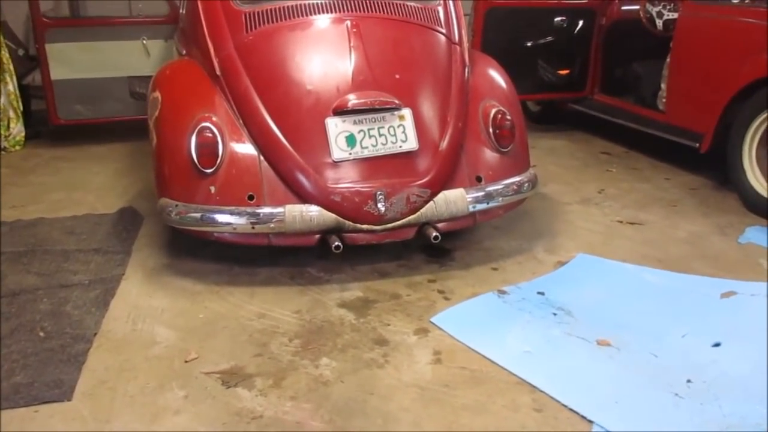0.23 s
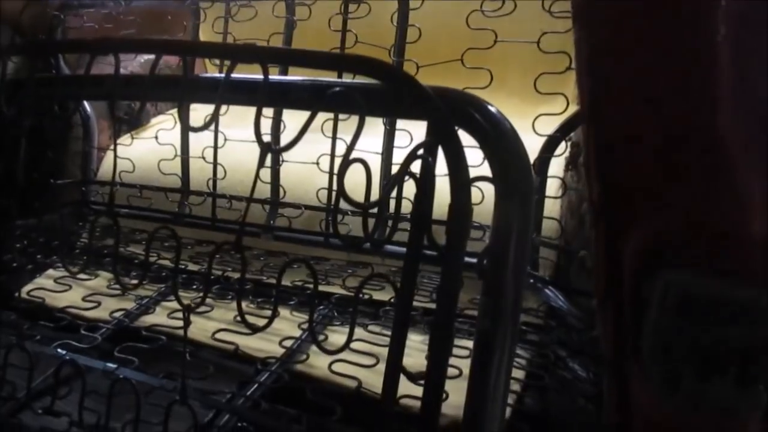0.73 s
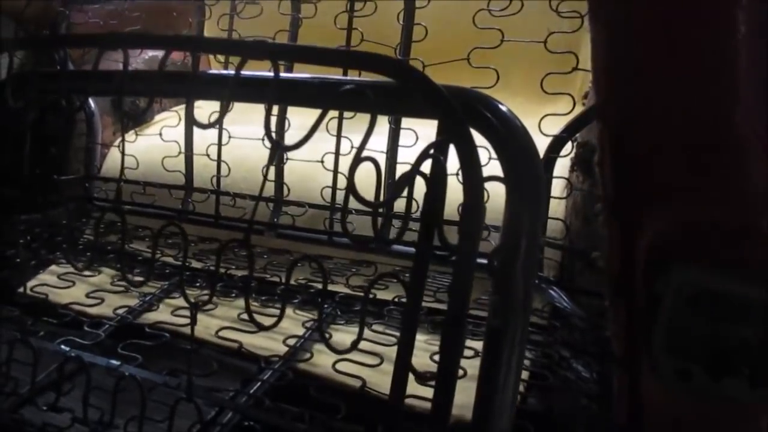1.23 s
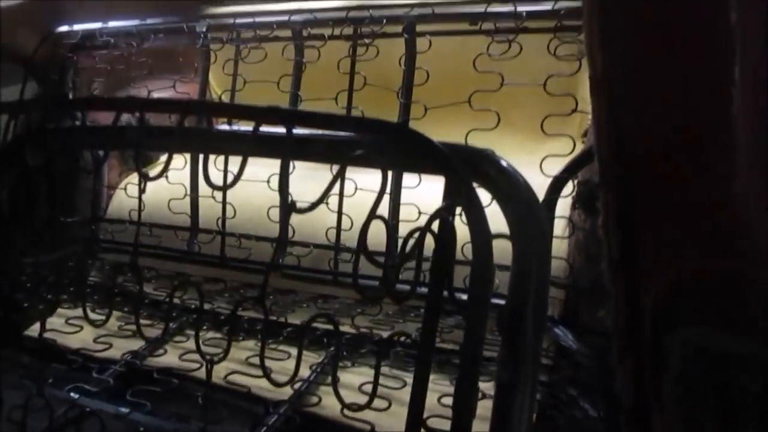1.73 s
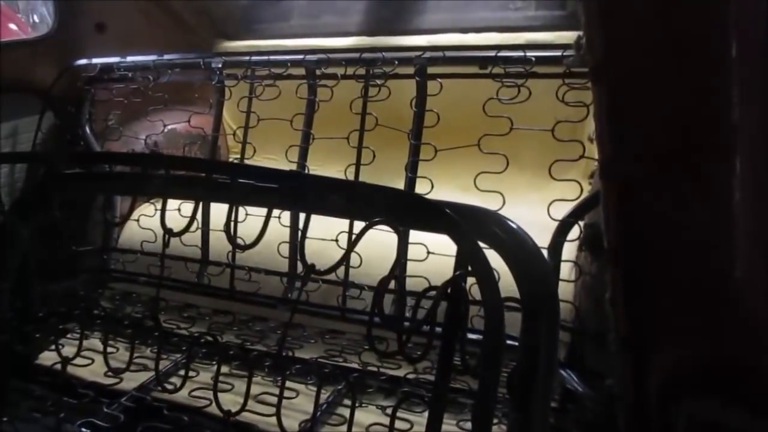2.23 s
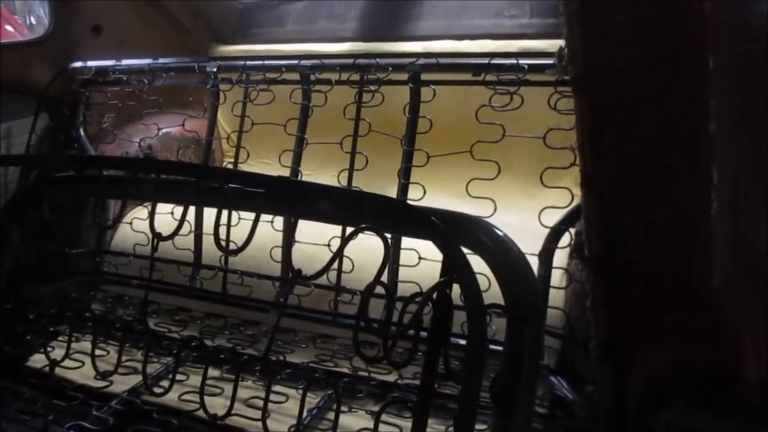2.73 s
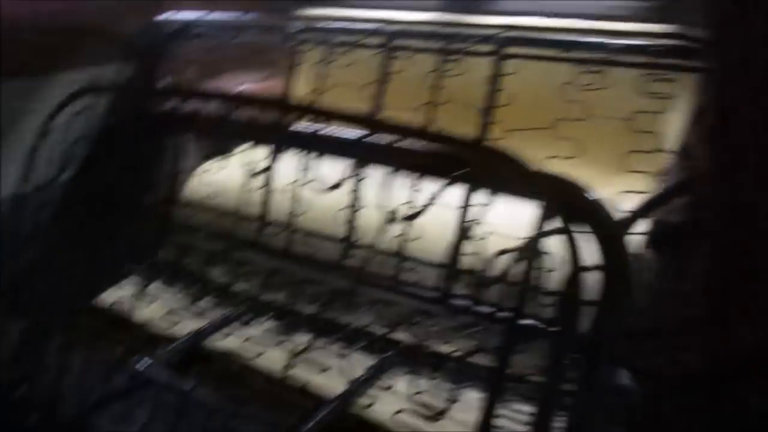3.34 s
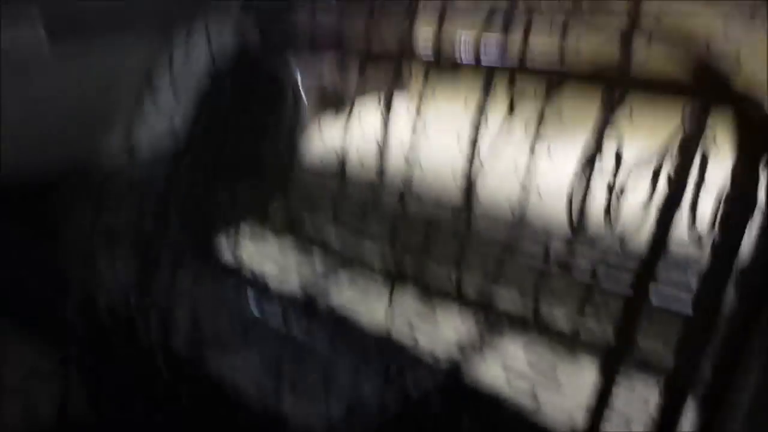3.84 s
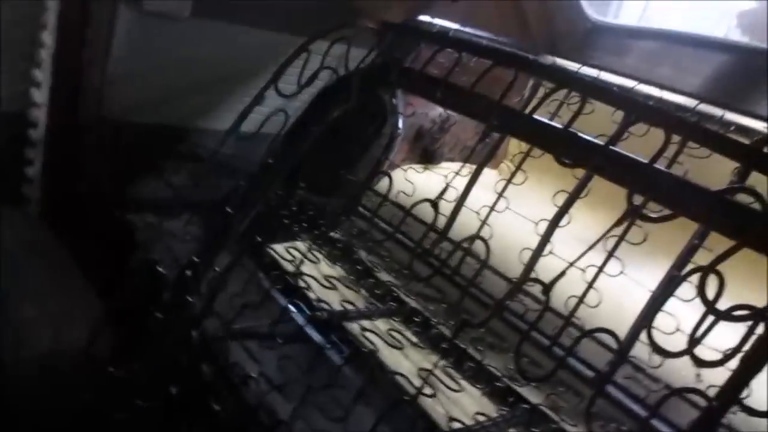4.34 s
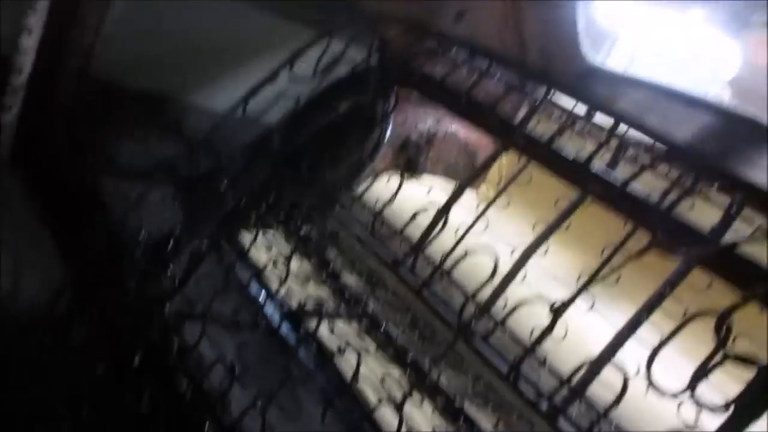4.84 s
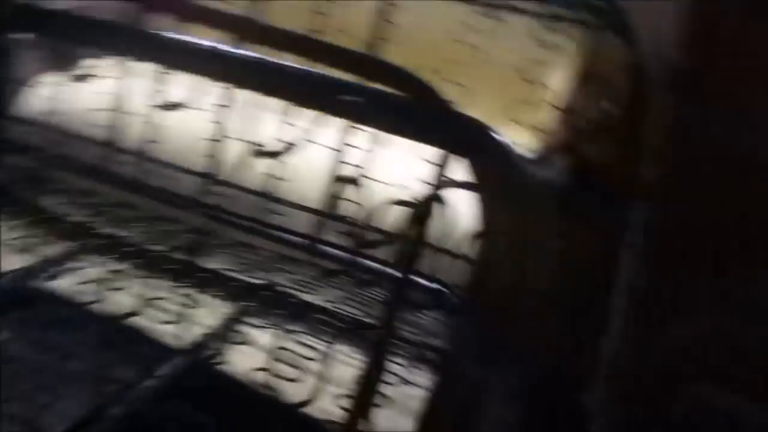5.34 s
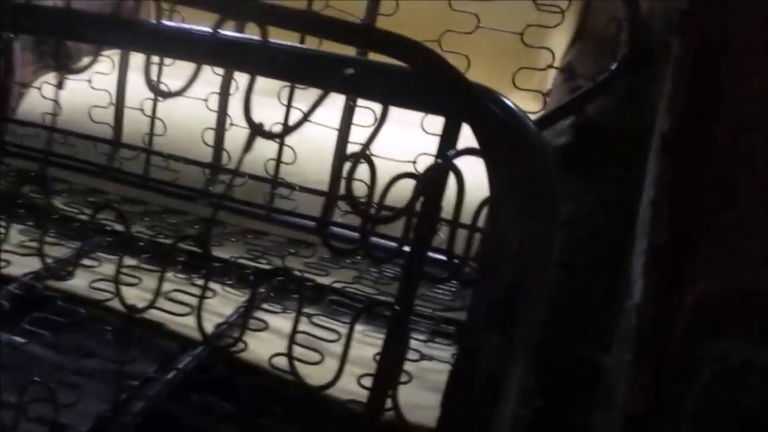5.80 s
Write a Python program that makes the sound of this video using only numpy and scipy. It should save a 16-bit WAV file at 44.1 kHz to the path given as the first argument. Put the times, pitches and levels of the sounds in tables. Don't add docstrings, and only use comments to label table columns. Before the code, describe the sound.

An air-cooled engine idles fast, first at the tail pipes, then droning and ticking inside a bare car body, and coasts unevenly to a stop.

```python
import sys
import numpy as np
from scipy import signal
from scipy.fft import rfft, irfft
from scipy.io import wavfile
from scipy.ndimage import uniform_filter1d

SR = 44100
rng = np.random.default_rng(int(sys.argv[2]) if len(sys.argv) > 2 else 0)


def inscribe(sig):
    pcm = np.round(np.clip(np.atleast_2d(sig).T, -1, 1) * 32767)
    wavfile.write(sys.argv[1], SR, pcm.astype(np.int16))


def decibels_to_gain(level_db):
    exponent = np.asarray(level_db, float) / 20
    return 10 ** exponent


N = 267642
OUTSIDE_END_S, INSIDE_START_S = .1875, .5645
KEY_OFF_S = 4.63
IDLE_HZ = 12.5

# frequency in Hz, width in Hz, level in dB,
# crank angle at which it is struck as a share of the cycle (0-1).
CABIN_MODES = [
    (30, 7, -5, .05),
    (47, 12, 0, .05),
    (100, 40, -14, .053),
    (148, 22, 0, .378),
    (270, 45, -5, .139),
]


def set_level(x, db):
    return x * decibels_to_gain(db) / np.sqrt(np.mean(x ** 2))


def curve(table):
    s, value = np.transpose(table)
    return np.interp(np.arange(N) / SR, s, value)


def coloured(points):
    hz, db = np.transpose(points)
    bin_hz = np.arange(N // 2 + 1) * SR / N
    shape = decibels_to_gain(np.interp(np.log(bin_hz + 1), np.log(hz), db, -90, -90))
    return set_level(irfft(rfft(rng.standard_normal(N)) * shape, N), 0)


def walk(rate_hz):
    hold = int(SR / rate_hz)
    steps = np.repeat(rng.standard_normal(N // hold + 1), hold)
    return uniform_filter1d(uniform_filter1d(steps, hold), hold)[:N]


def ring(x, modes):
    out = 0
    for k, (hz, width, db) in enumerate(modes):
        out = out + (-1) ** k * decibels_to_gain(db) * signal.lfilter(*signal.iirpeak(hz, hz / width, SR), x)
    return out


def orders(table, cycles, extra_db, angle, wobble_db):
    out = 0
    for k, db in table:
        gain = decibels_to_gain(db + extra_db(k) + wobble_db * walk(9.9))
        out = out - gain * np.cos(2 * np.pi * k * (cycles - angle(k)))
    return out


def since_key_off():
    return (np.arange(N) / SR - KEY_OFF_S).clip(0)


def unfired():
    return np.minimum(since_key_off() / .14, 1)


def cycle_rate():
    # time in seconds, firing rate in Hz (four firings a cycle).
    idle_hunt = [(.66, 49.8), (.9, 50.1), (1.14, 49.9), (1.46, 50.31), (1.8, 49.92), (2.1, 49.66),
                 (2.42, 49.46), (2.72, 50.36), (3.15, 50.04), (3.52, 49.55), (4.0, 50.33), (4.2, 50.02),
                 (4.36, 50.16), (4.55, 49.85)]
    down = np.exp(-since_key_off() / 1.0)
    stumble = 1 + .05 * 2 * (1 - down) * walk(14)
    return curve(idle_hunt) * down * stumble / 4


def cabin_db(hz):
    return 10 * np.log10(sum(decibels_to_gain(2 * db) / (1 + (2 * (hz - f) / w) ** 2) for f, w, db, _ in CABIN_MODES))


def struck(hz):
    return min(CABIN_MODES, key=lambda mode: abs(np.log(mode[0] / hz)))[3]


def cabin_boom(hz, cycles, slow):
    # multiple of the cycle, level in dB.
    cabin_orders = [(1, -47), (2, -35), (3, -18), (4, -3), (5, -28), (6, -24), (7, -20), (8, -11), (9, -19),
                    (10, -12), (11, -19), (12, 0), (13, -19), (14, -12), (15, -19), (16, -28), (17, -19),
                    (18, -18), (19, -23), (20, -10), (21, -14), (22, -7), (23, -15), (24, -25)]
    # multiple of the cycle, level in dB.
    gear_mesh = [(34, -27), (52, -29), (54, -24), (56, -25), (61, -21), (62, -20)]
    # time in seconds, level in dB.
    rocking = [
        (4.63, 0),
        (4.82, 4),
        (5.02, -8),
        (5.2, 3),
        (5.55, 2),
        (5.62, -12),
        (5.72, -10),
        (5.84, 3),
        (5.93, -14),
    ]
    firing_db = curve(rocking)
    uneven_db = .3 - 8 * unfired()
    soft_db = .6 * np.minimum(8 * slow.clip(0), 1)

    def slide_db(k):
        resonance_db = cabin_db(k * hz) - cabin_db(k * IDLE_HZ)
        stroke_db = uneven_db if k % 4 else firing_db
        return resonance_db + stroke_db - soft_db * k - 2.5 * (k % 2)

    boom = orders(cabin_orders, cycles, slide_db, lambda k: struck(k * IDLE_HZ), 1.1 + 3 * slow)
    boom += orders(gear_mesh, cycles, lambda k: -70 * slow, lambda k: .3, 0.73)
    return decibels_to_gain(-20.0) * boom * decibels_to_gain(3 * slow * walk(22))


def tail_pipes():
    # multiple of the cycle, level in dB.
    pipe_orders = [(1, -34), (2, -32), (3, -30.5), (4, -10), (5, -27), (6, -4), (7, -26), (8, -2.5),
                   (9, -17.5), (10, -4.5), (11, -16.5), (12, -2), (13, -21.5), (14, -10), (15, -8),
                   (16, -4.5), (17, -20.5), (18, -3.5), (19, -4), (20, -5), (21, -12.5), (22, -5),
                   (23, -12), (24, -8.5), (25, -30), (26, -24.5), (27, -13.5), (28, -15.5)]
    # frequency in Hz, density in dB per Hz.
    gas_spectrum = [(220, -46.5), (380, -8), (451, -9), (615, -2), (665, -6), (1090, -7.5), (1420, -19.5),
                    (2950, -17.5), (3290, -23.5), (8750, -23.5), (15500, -41.5)]
    cycles = 11.98 * np.arange(N) / SR
    note = orders(pipe_orders, cycles, lambda k: -7 * (k % 2), lambda k: rng.random(), 1.2)
    pulse = decibels_to_gain(2 * np.cos(8 * np.pi * cycles) + 1.5 * walk(40))
    return decibels_to_gain(-26.0) * note + set_level(pulse * coloured(gas_spectrum), -33)


def valve_clatter(cycles):
    # crank angle (0-1), level in dB.
    knocks = [(0.069, -5.5), (.29, -11.5), (0.349, -5.5), (0.541, -2), (.83, -9.5), (.94, -8.5)]
    # frequency in Hz, width in Hz, level in dB.
    case_modes = [(348, 35, -3.5), (417.5, 26.2, -3), (498, 108, -7.5), (634.5, 8.5, -5), (659, 10.9, -2.5),
                  (772, 49.7, -2.5), (909, 65, -6), (1041, 38, -6.5), (1112, 38.5, -8.5)]
    angle, size = rng.random((16, 2)).T
    angle = np.append(angle, np.array(knocks)[:, 0])
    size = np.append((2 * size - 1) * decibels_to_gain(-3), -decibels_to_gain(np.array(knocks)[:, 1]))
    turns = np.arange(int(cycles[0]), int(cycles[-1]))[:, None] + angle
    chance = rng.standard_normal(turns.shape + (2,))
    at = np.searchsorted(cycles, turns) + (8 * chance[..., 0]).astype(int)
    blows = np.zeros(N)
    np.add.at(blows, at.clip(0, N - 1).ravel(), (size * decibels_to_gain(2 * chance[..., 1])).ravel())
    rattle = decibels_to_gain(2) * rng.standard_normal(N)
    return set_level(ring(set_level(blows, 0) + rattle, case_modes), 0)


def loose_tappets(cycles):
    # crank angle (0-1), panel frequency in Hz, width in Hz, level in dB.
    tappet_panels = [
        (.25, 775, 24, -38.5),
        (.0, 665, 45, -43),
        (.9, 410, 45, -47),
        (.04, 1000, 90, -48),
    ]
    out = 0
    turns = np.arange(int(cycles[0]), int(cycles[-1]))
    for angle, hz, width, db in tappet_panels:
        blows = np.zeros(N)
        blows[np.searchsorted(cycles, turns + angle)] = decibels_to_gain(2 * rng.standard_normal(len(turns)))
        padded = uniform_filter1d(uniform_filter1d(blows, size=14), size=11)
        out = out + set_level(ring(padded, [(hz, width, 0)]), db + 30)
    return out


def airborne_db(hz, law):
    # time in seconds, gain in dB.
    facing = [(.56, 4.5), (1.4, 1), (1.75, 2), (2.5, 4.5), (3.1, 7.5), (3.4, -1), (3.95, -6), (4.1, 1.5),
              (4.28, -4), (4.65, -2.5), (5.4, 1), (5.85, -3), (6.0, -3)]
    idle_db, per_speed_db, per_facing_db, unfired_db = law
    speed_db = 20 * np.log10(hz / hz[0])
    return idle_db + per_speed_db * speed_db + per_facing_db * curve(facing) + unfired_db * unfired()


def valve_gear(hz, cycles, slow):
    clatter_law = (-29.5, 1, 0.12, 1.66)
    strikes = decibels_to_gain(-1) * valve_clatter(cycles) + decibels_to_gain(-12 * slow) * loose_tappets(cycles)
    return decibels_to_gain(airborne_db(hz, clatter_law)) * strikes


def roughness_and_rumble(strokes, slow):
    # frequency in Hz, density in dB per Hz.
    rough_spectrum = [(25, -22), (45, -6), (68, -12), (95, -6), (130, 0), (155, -1), (190, -5), (265, 2),
                      (310, -6), (400, -20)]
    # frequency in Hz, width in Hz, level in dB.
    pan_modes = [(92, 26, -2), (120, 20, -5), (140, 30, 0), (160, 18, -8), (228, 30, -9)]
    rough_db = 2 - 8 * unfired() - 35.5 - 9 * slow + 2 * walk(12) + 3 * slow * strokes
    rough = decibels_to_gain(rough_db) * coloured(rough_spectrum)
    peak_db, rest_db, rise_s, settle_s = -25, -35.5, .12, 0.41
    since = since_key_off()
    settle = np.exp(-((since - rise_s).clip(0) / settle_s) ** 2)
    rumble_db = rest_db + (peak_db - rest_db) * settle - 30 * (1 - since / rise_s).clip(0)
    pan = set_level(ring(coloured(rough_spectrum), pan_modes), 0)
    return rough + decibels_to_gain(rumble_db + 5 * slow * strokes) * pan


def cooling_fan(hz, cycles, breath_db, slow):
    # frequency in Hz, density in dB per Hz.
    fan_spectrum = [(740, -22), (1250, -1), (1560, -5), (1690, -3), (2410, -6.5), (2900, -7), (5200, -16.5),
                    (6760, -19), (11400, -120)]
    # frequency in Hz, density in dB per Hz.
    hiss_spectrum = [(3060, 0), (5200, -4.5), (6880, -3), (8570, -2), (9350, -4), (11600, -9),
                     (14600, -24.5), (15500, -33)]
    # idle level in dB, dB per dB of speed, dB per dB of facing, dB gained once unfired.
    fan_law = (-40.5, 1.9, 0.25, 0.9)
    hiss_law = (-49, 0.7, 0.25, -5.5)
    shaft = decibels_to_gain(-37.5) * np.sin(2 * np.pi * 3.24 * cycles) * (hz / IDLE_HZ) ** 4
    blown_db = airborne_db(hz, fan_law) + 0.34 * breath_db + 1.07 * walk(13)
    blown = decibels_to_gain(blown_db) * coloured(fan_spectrum)
    air = coloured(hiss_spectrum)
    chirp = decibels_to_gain(-8.0 - 7.2 * slow + 4.2 * walk(11)) * ring(air, [(8300, 300, 0)])
    hiss_db = airborne_db(hz, hiss_law) + breath_db + 1.1 * walk(18)
    return shaft + blown + decibels_to_gain(hiss_db) * (air + chirp)


def key_hand_and_puffs():
    # time in seconds, level in dB, centre in Hz, decay in seconds.
    tick_events = [(3.281, -33, 9000, .015), (3.594, -19.5, 6900, 0.011), (3.597, -20, 3270, 0.011),
                   (3.601, -20, 1700, .02), (3.734, -14, 1400, 0.011), (4.982, -4.5, 190, 0.095),
                   (4.645, -31.5, 7700, .06), (5.39, -52, 8700, .07), (5.43, -48, 8900, 0.065),
                   (5.476, -50, 8900, 0.082), (5.5, -42, 3500, .1), (5.575, -40, 2500, .07),
                   (5.607, -42, 9500, 0.07), (5.655, -47, 8500, .07), (5.696, -52, 9000, .06),
                   (5.737, -43.5, 8500, .25), (5.744, -39.5, 2900, 0.13), (5.885, -51, 8500, 0.078),
                   (5.93, -44, 2000, 0.086), (5.941, -25, 550, .3)]
    # time in seconds, level in dB, centre in Hz, decay in seconds, rise in seconds.
    sleeve_brush = (3.2, -37, 8900, .1, .077)
    events = [(s, db, hz, decay, .09 * decay) for s, db, hz, decay in tick_events] + [sleeve_brush]
    out = np.zeros(N)
    t = np.arange(SR // 5) / SR
    for s, db, hz, decay, rise in events:
        fade = np.exp(-np.log(1000) * (t - rise) / decay)
        burst = rng.standard_normal(len(t)) * np.minimum(t / rise, fade)
        for _ in range(2):
            burst = signal.lfilter(*signal.iirpeak(hz, .9, SR), burst)
        start = int(s * SR)
        burst = burst[:N - start]
        out[start:start + len(burst)] += decibels_to_gain(db) * burst
    return signal.sosfilt(signal.butter(3, 11000, fs=SR, output="sos"), out)


def garage_and_whine():
    # frequency in Hz, density in dB per Hz.
    garage_spectrum = [(60, -28), (150, 8), (300, -2), (550, -3), (1000, -17.5), (2500, -26), (6000, -50)]
    whine = decibels_to_gain(-78) * np.sin(2 * np.pi * 11795 * np.arange(N) / SR)
    return decibels_to_gain(-38.5) * coloured(garage_spectrum) + whine


def inside():
    hz = cycle_rate()
    cycles = np.cumsum(hz) / SR
    cycles -= cycles[int(.745 * SR)]
    slow = 1 - hz / IDLE_HZ
    strokes = np.cos(8 * np.pi * cycles)
    breath_db = 0.56 * np.cos(2 * np.pi * (cycles - .58)) + (0.15 + 2.1 * slow) * strokes
    engine = cabin_boom(hz, cycles, slow) + valve_gear(hz, cycles, slow)
    engine = engine + roughness_and_rumble(strokes, slow)
    fan = cooling_fan(hz, cycles, breath_db, slow)
    return engine + fan + key_hand_and_puffs() + garage_and_whine()


def scene():
    join = .5 * (OUTSIDE_END_S + INSIDE_START_S) * SR
    return np.where(np.arange(N) < join, tail_pipes(), inside())[None]


def thin_treble(x):
    dropouts = [1.147, 2.34, 3.727, 3.92, 4.88]
    treble = signal.sosfiltfilt(signal.butter(6, 3300, "high", fs=SR, output="sos"), x)
    t = np.arange(N) / SR
    for s in dropouts:
        kept = 0
        for hz in 3000 + np.cumsum(rng.uniform(1300, 2300, size=3)):
            strip = signal.butter(2, [hz - 330, hz + 330], "band", fs=SR, output="sos")
            kept = kept + signal.sosfiltfilt(strip, treble)
        x = x - np.exp(-((t - s) / .008) ** 4) * (treble - kept)
    return x


def cut(x):
    t = np.arange(N) / SR
    remnant = decibels_to_gain(-44) * np.clip(1 - ((t - OUTSIDE_END_S) / .02) ** 2, 0, 1)
    first = np.where(t < OUTSIDE_END_S, 1, remnant)
    return x * np.maximum(first, np.clip((t - INSIDE_START_S) / 0.0012, 0, 1))


def top_cut(x):
    return signal.sosfilt(signal.butter(12, 15690, fs=SR, output="sos"), x)


def record(dry):
    x = signal.sosfilt(signal.butter(2, 28, "high", fs=SR, output="sos"), dry)
    return top_cut(cut(thin_treble(x)))


dry = scene()
out = record(dry)
inscribe(out)
```